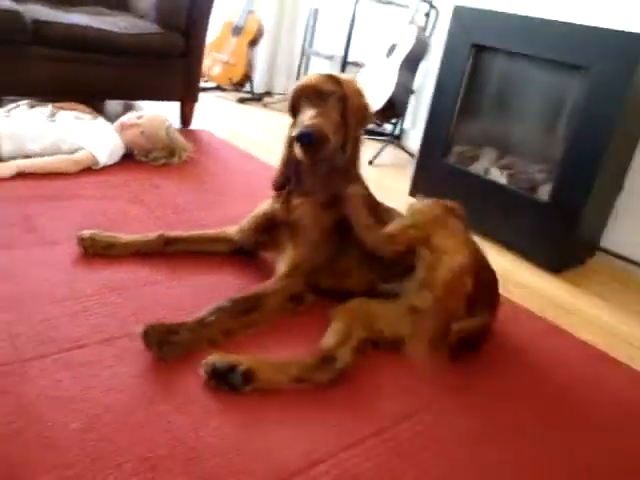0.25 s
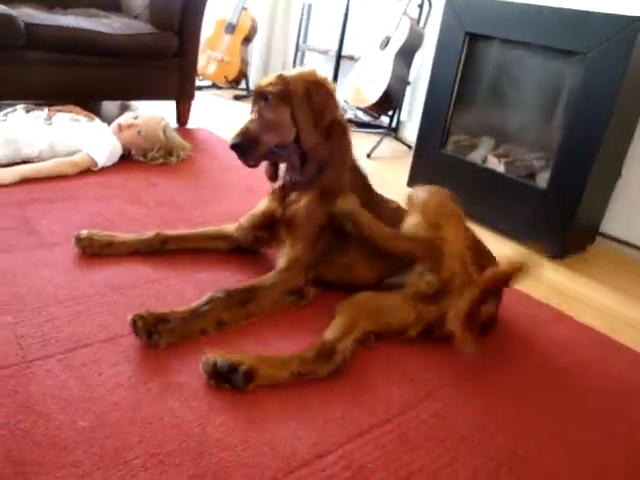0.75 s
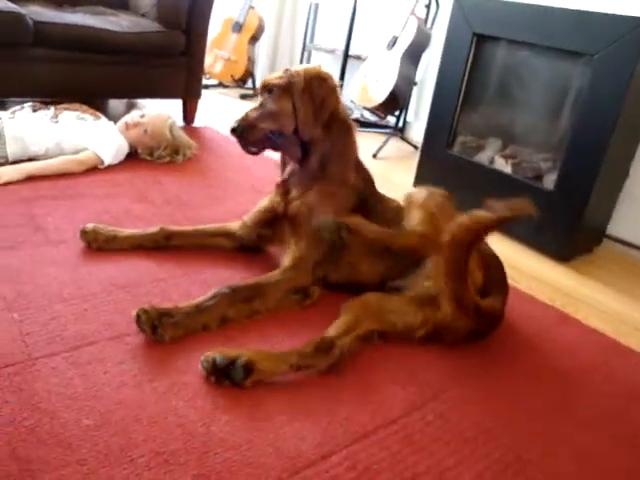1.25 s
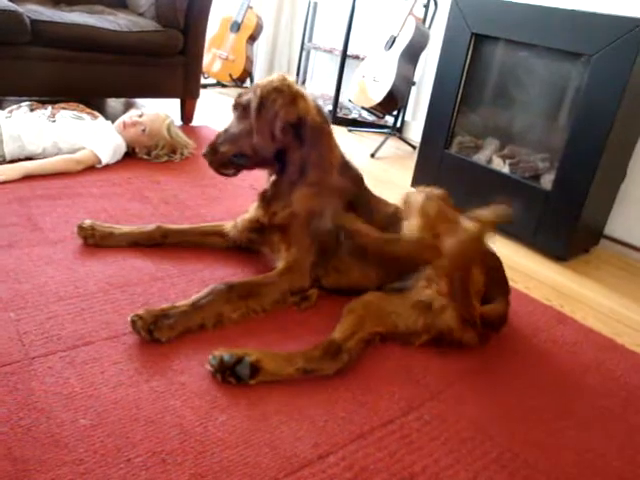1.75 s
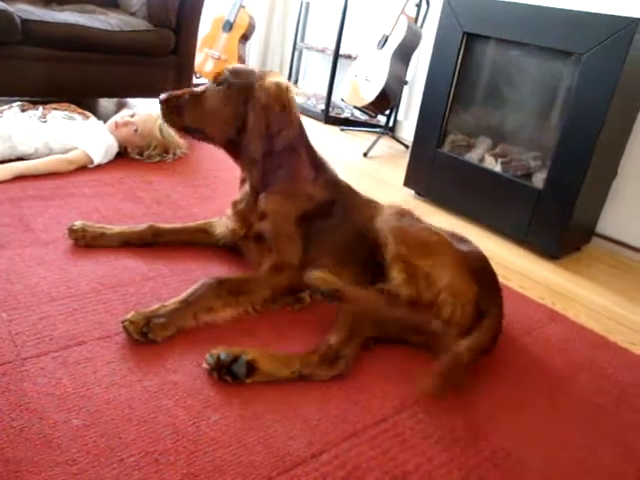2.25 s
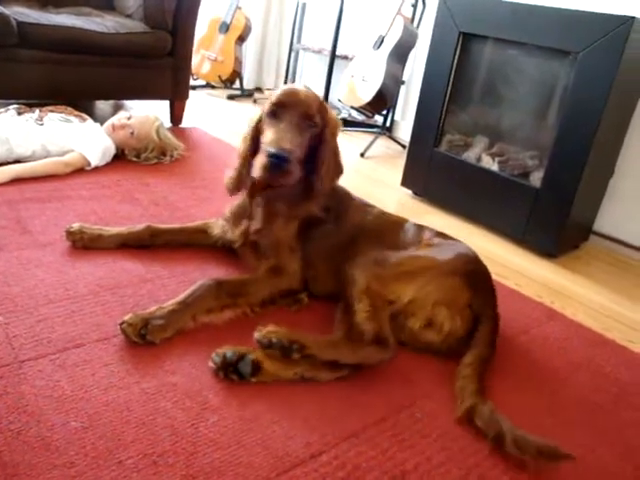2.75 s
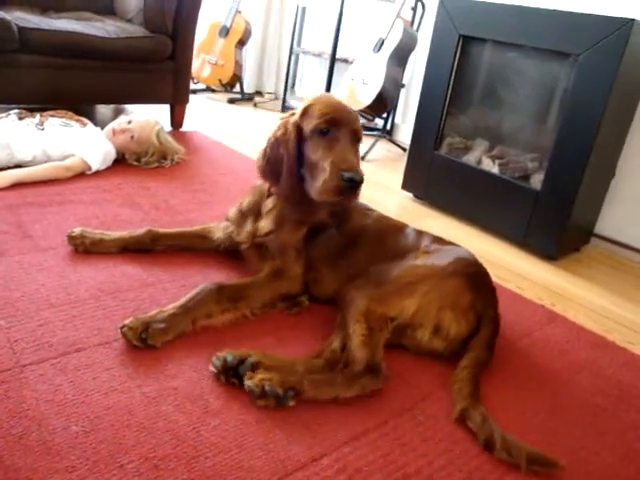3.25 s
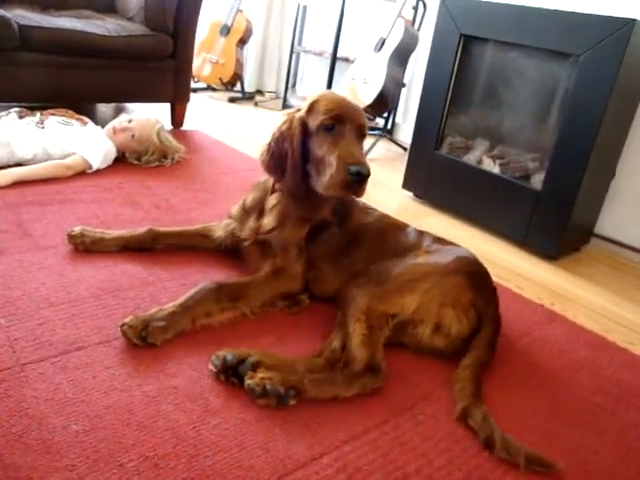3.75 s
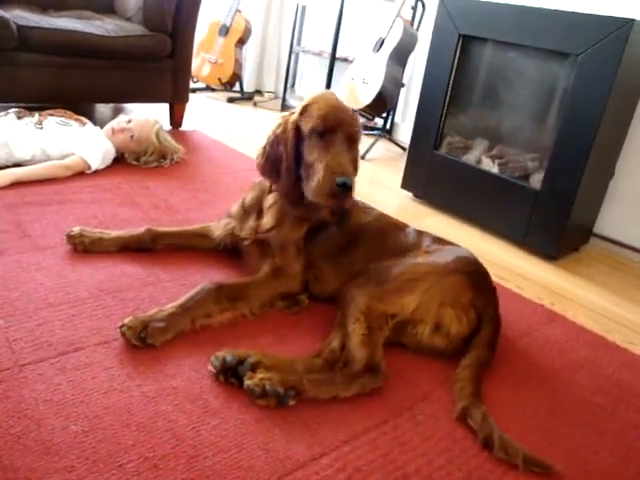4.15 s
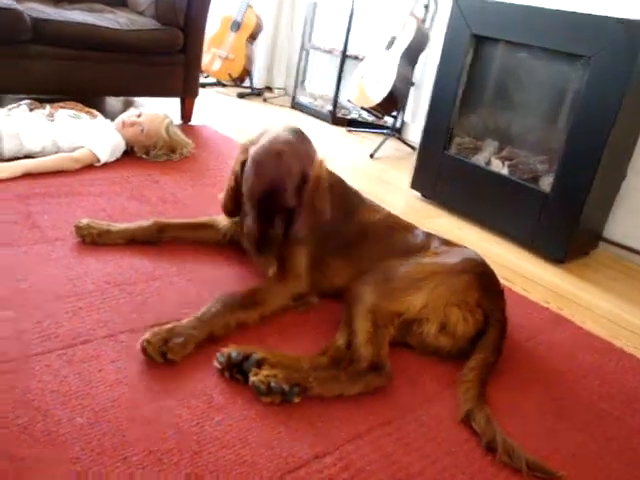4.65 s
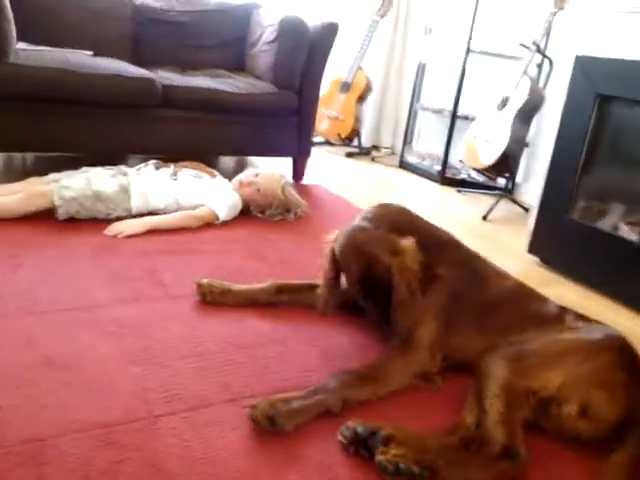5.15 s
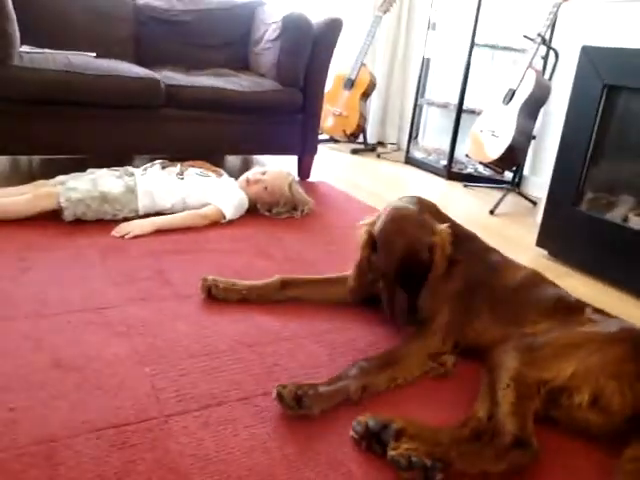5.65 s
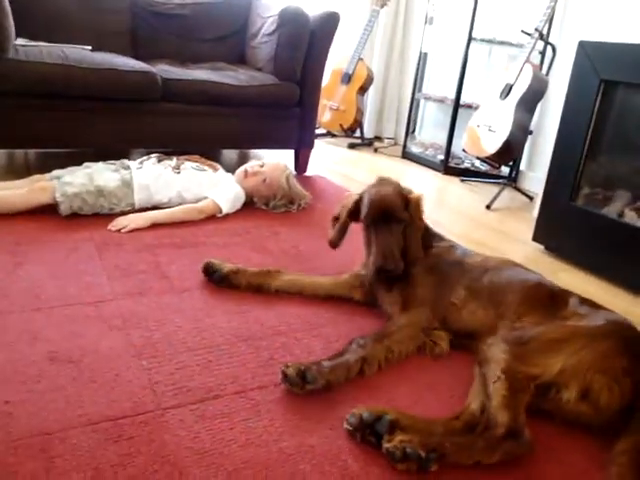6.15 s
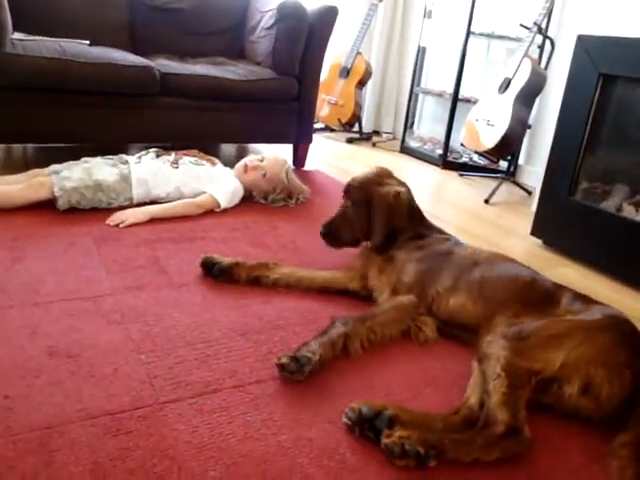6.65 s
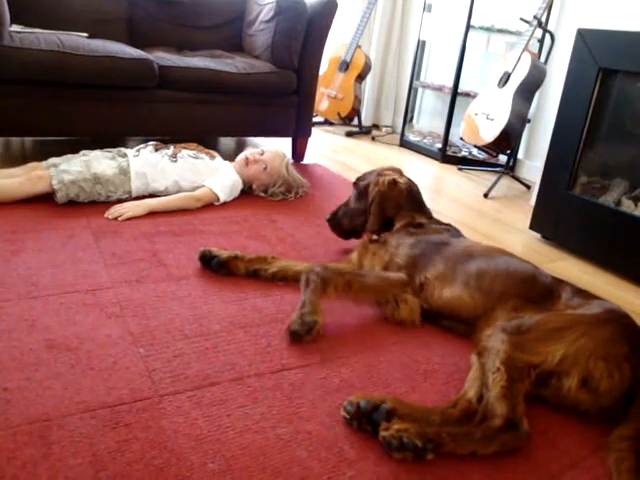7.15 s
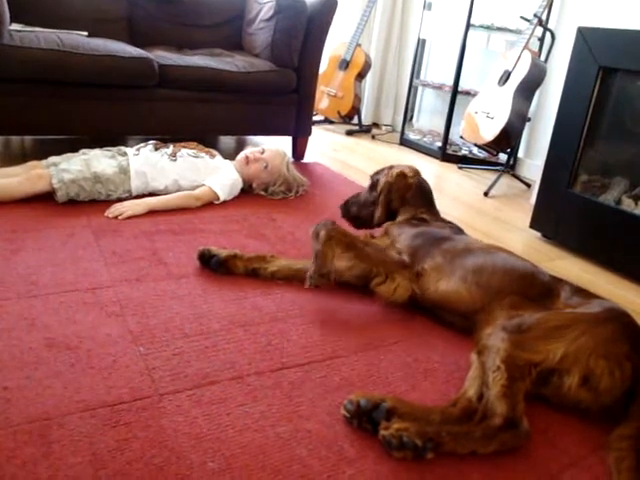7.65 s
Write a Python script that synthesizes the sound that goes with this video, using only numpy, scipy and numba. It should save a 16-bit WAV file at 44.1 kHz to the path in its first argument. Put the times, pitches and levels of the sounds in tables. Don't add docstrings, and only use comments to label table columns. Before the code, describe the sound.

Birds whistle faintly outside while a dog scratches and its claws tick; a sharp click, then a thin, wavering puppy whine in a live room.

```python
import sys
import numpy as np
from scipy import signal
from scipy.fft import rfft, irfft
from scipy.io import wavfile
from scipy.ndimage import uniform_filter1d
from numba import njit

SR = 44100
rng = np.random.default_rng(int(sys.argv[2]) if len(sys.argv) > 2 else 0)


def dump_mix(stems):
    frames = np.atleast_2d(stems).T
    limited = np.clip(frames, -1, 1)
    pcm = np.round(limited * 32767).astype(np.int16)
    wavfile.write(sys.argv[1], SR, pcm)


def to_linear_factor(level_db):
    exponent = np.asarray(level_db, float) / 20
    return 10 ** exponent


N = 348900


def unit(x):
    return x / np.sqrt(np.mean(x ** 2))


def walk(rate):
    hold = int(SR / rate)
    steps = np.repeat(rng.standard_normal(N // hold + 1), hold)
    return 1.233 * uniform_filter1d(uniform_filter1d(steps, hold), hold)[:N]


def track(table, fade_s=0.0048):
    s, *columns = np.transpose(table)
    t = np.arange(N) / SR
    gate = np.clip(np.minimum(t - s[0], s[-1] + fade_s - t) / fade_s, 0, 1)
    return gate, [np.interp(t, s, column) for column in columns]


@njit
def svf(x, hz, width):
    y, b, l = np.empty(len(x)), 0., 0.
    for i in range(len(x)):
        g, k = np.tan(np.pi * hz[i] / SR), width / hz[i]
        v = (b + g * (x[i] - l)) / (1 + g * (g + k))
        b, l, y[i] = 2 * v - b, l + 2 * g * v, k * v
    return y


def band(x, hz, width_hz):
    hz = hz + np.zeros(len(x))
    return svf(svf(x, hz, 1. * width_hz), hz, 1. * width_hz)


def swells(table):
    fall_db = 10
    t = np.arange(0, N / SR + .002, .001)
    shapes = []
    for top, rise, fall, *_ in table:
        distance = np.maximum((top - t) / max(rise, .01), (t - top) / max(fall, .01))
        shapes.append(to_linear_factor(-fall_db * distance))
    power = np.array(shapes) ** 2
    return lambda weight: np.interp(np.arange(N) / SR, t, np.asarray(weight) @ power) + 1e-30


# (f/Hz, level/dB)
HISS_SPECTRUM = [(15, -63.5), (25, -17.5), (199, -2.5), (337, 1.5), (412, 1), (478, 1), (872, -2),
                 (1240, -1.5), (1630, -4.5), (2620, -6.5), (3450, -7.5), (5410, -8.5), (9870, -9),
                 (12800, -25), (21700, -120)]


def floor():
    hz, db = np.transpose(HISS_SPECTRUM)
    f = np.arange(N // 2 + 1) * SR / N + 1
    colour = to_linear_factor(np.interp(np.log(f), np.log(hz), db))
    hiss = irfft(rfft(rng.standard_normal(N)) * colour, N)
    return to_linear_factor(-58 + .5 * walk(3.21)) * unit(hiss)


# (top t/s, rise t/s, fall t/s, centre f/Hz, level/dB)
BIRDS_HIGH = [(0., .1, 0.26, 6160, -56.5), (.51, 0.091, 0.08, 5830, -63), (.66, .03, 0.37, 6080, -60.5),
              (.99, .5, 0.4, 5870, -55.5), (1.32, 0.07, 0.46, 5750, -61.5), (1.72, 0.062, 0.13, 5980, -52),
              (1.87, 0.11, 0.18, 6000, -57.5), (2.27, 0.2, 0.062, 6100, -57.5),
              (2.44, 0.042, 0.13, 5700, -63), (3.06, 0.32, 0.2, 6110, -53.5),
              (3.48, 0.057, 0.47, 5910, -54), (3.9, 0.16, 0.14, 5670, -60.5), (4.05, 0.36, .4, 5960, -49.5),
              (4.25, 0.11, 0.18, 5980, -53.5), (4.43, 0.11, 0.25, 5710, -55),
              (4.97, 0.89, 0.12, 5960, -54.5), (5.18, 0.19, .3, 6150, -57), (5.62, 0.17, 0.38, 5650, -55.5),
              (5.79, 0.33, 0.3, 5620, -58.5), (6.08, 0.12, 0.16, 5660, -58), (6.39, .08, .25, 5760, -57.5),
              (7.31, 0.12, 0.14, 5520, -73.5), (7.89, 0.19, .05, 6100, -65)]
# (top t/s, rise t/s, fall t/s, centre f/Hz, level/dB)
BIRDS_LOW = [(.9, 0.66, 0.32, 5880, -59), (1.25, .06, 0.12, 5500, -61), (2.07, 0.3, 0.41, 5430, -57.5),
             (2.46, 0.38, 0.13, 5320, -61), (2.75, 0.039, 0.55, 5650, -57.5), (3.26, .1, 0.22, 5420, -66.5),
             (3.39, 0.019, .12, 5480, -56), (3.92, 0.074, 0.072, 5220, -55), (4.2, 0.24, .2, 5040, -56.5),
             (4.4, 0.17, 0.13, 5510, -61), (4.95, 0.21, 0.21, 5260, -54), (5.13, 0.14, 0.28, 5860, -61.5),
             (5.6, 0.7, 0.23, 5240, -58), (5.86, 0.43, 0.07, 5410, -54.5), (6.01, 0.068, .12, 4800, -66.5),
             (6.26, 0.016, 0.22, 5480, -62.5), (7.09, 0.27, 0.026, 5230, -65.5), (7.29, .2, 0.4, 5600, -68)]


def birds(table, width_hz, line_db):
    mix = swells(table)
    *_, centre, db = np.transpose(table)
    power = mix(to_linear_factor(2 * db))
    hz = np.clip(mix(to_linear_factor(2 * db) * centre) / power, 4500, 6500)
    blur = band(rng.standard_normal(N), hz * (1 + 0.01 * walk(5.5)), width_hz)
    blur = unit(signal.sosfilt(signal.butter(6, 6500, fs=SR, output="sos"), blur))
    line = unit(band(rng.standard_normal(N), hz * (1 + 0.012 * walk(9.7)), 88))
    return np.sqrt(power) * to_linear_factor(1.42 * walk(45)) * (blur + to_linear_factor(line_db + 3.3 * walk(5.4)) * line)


# (top t/s, rise t/s, fall t/s, level/dB, bright over dull level/dB)
RUB = [(0., .1, 0.22, -60.5, 6.5), (.122, 0.28, 0.016, -58.5, 5), (.46, 0.64, 0.59, -63, 2.5),
       (.96, .4, 0.3, -65, 5), (1.186, 0.049, 0.074, -74, 12.5), (1.45, 0.083, .04, -67, 1),
       (1.51, 0.067, 0.41, -56, -0.5), (1.74, 0.081, 0.13, -57, -0.5), (1.87, 0.24, 0.15, -52.5, -5),
       (2.13, .03, .25, -67, -1), (2.45, 0.31, 0.13, -61, -1), (2.6, 0.12, 0.91, -66, -10),
       (3.21, 0.071, .015, -59.5, -6.5), (3.3, 0.046, .02, -66, -3), (4.08, 0.69, .09, -67.5, -2),
       (4.24, 0.044, 1, -62.5, -13.5), (4.5, 0.032, 0.16, -70, 14.5), (4.6, 0.12, 0.1, -66.5, 14.5),
       (4.94, 0.34, 0.047, -65.5, 2.5), (5.04, 0.073, 0.3, -65.5, 1), (5.228, 0.022, 0.017, -60, -1),
       (5.67, 0.24, 0.36, -59, 7)]
# (top t/s, rise t/s, fall t/s, level/dB, bright over dull level/dB)
RUB_LATE = [(5.8, 0.061, 0.61, -57.5, 1), (6.1, 0.24, 0.15, -62, -14), (6.5, 0.16, .15, -70, 10),
            (6.7, 0.22, 0.33, -65, 0.5), (7.03, 0.18, 0.12, -73, 12.5), (7.1, 0.11, .15, -65.5, 8.5),
            (7.2, .1, 0.12, -67, 8), (7.3, 0.14, 0.14, -61.5, 1.5), (7.7, .5, 0.61, -65.5, -3)]


def fibre_snaps():
    size_db = np.minimum(2.7 * rng.exponential(size=N), 14)
    return rng.standard_normal(N) * to_linear_factor(size_db) * to_linear_factor(1.45 * walk(25))


def rub():
    strokes = RUB + RUB_LATE
    dull = unit(band(fibre_snaps(), 780, 1000))
    bright = unit(band(fibre_snaps(), 2340, 3000))
    mix = swells(strokes)
    *_, db, bright_db = np.transpose(strokes)
    return np.sqrt(mix(to_linear_factor(2 * db))) * dull + np.sqrt(mix(to_linear_factor(2 * (db + bright_db)))) * bright


# (t/s, peak level/dB, ring f/Hz, tail t60/s)
BOARDS = [
    (.01, -52, 350, 0.96),
    (.108, -53, 138, 0.24),
    (.49, -54.5, 132, 0.56),
    (1.172, -49, 393, 0.06),
    (1.83, -50, 121, 0.076),
    (2.44, -58, 109, 0.13),
]
# (t/s, peak level/dB, ring f/Hz, tail t60/s)
THUMPS = [
    (0.104, -39, 180, 0.24),
    (0.134, -39, 574, 0.083),
    (0.4885, -36, 347, 0.084),
    (0.505, -45, 242, 0.13),
    (.503, -44, 477, .04),
    (1.169, -43.5, 380, 0.057),
    (1.828, -47, 580, 0.17),
]
# (t/s, peak level/dB, ring f/Hz, tail t60/s)
TICKS = [(.154, -45, 2270, .03), (.2414, -41, 2150, 0.028), (.2503, -36.5, 2900, 0.049),
         (.4698, -45.5, 2780, .03), (.5222, -44, 2330, .03), (.7138, -39.5, 2300, .05),
         (.733, -44, 2300, .05), (.9158, -38, 2300, .04), (.9457, -35, 2330, .06), (1.0246, -49, 2360, .03),
         (1.1548, -44, 2430, .03), (1.1867, -44, 2350, .03), (1.2072, -41, 2250, 0.045),
         (1.2296, -44, 2350, .03), (1.418, -36, 2240, .025), (1.4245, -37.5, 2300, .025),
         (1.436, -36.5, 2330, .05), (2.0896, -51, 1100, .03), (2.4394, -46, 2000, .06),
         (5.2294, -46.5, 1270, .047), (5.5513, -43.5, 1240, 0.12), (5.6156, -36, 1200, .12),
         (5.6645, -41, 1800, .05), (5.64, -43, 1250, .05), (5.6795, -32.5, 1300, 0.089),
         (5.686, -35, 2600, 0.055), (.6, -41, 1100, .02), (.6045, -38.5, 1450, 0.028),
         (.608, -40, 2600, 0.022), (6.9257, -44, 1900, .05), (7.033, -34.5, 1780, 0.14),
         (7.09, -32, 1138, 0.11), (7.1492, -41, 1900, .06), (7.195, -35, 1900, .08),
         (7.2534, -41, 1900, .06)]


def hits(table, q, tail_db, spread):
    out, t = np.zeros(N + SR), np.arange(SR // 2) / SR
    for s, db, hz, t60 in table:
        ring = np.sin(2 * np.pi * hz * t) * np.exp(-np.pi * hz * t / q)
        ring *= np.clip(hz * t, 0, 1)
        tail = unit(band(rng.standard_normal(len(t)), hz, spread * hz))
        tail *= np.exp(-np.log(1000) * t / t60)
        i = int(s * SR)
        out[i:i + len(t)] += to_linear_factor(db) * (ring + to_linear_factor(tail_db) * tail)
    return out[:N]


def room(x):
    t60_s, treble_damping = 0.53, 0.55
    t = np.arange(SR) / SR
    noise = rng.standard_normal(SR)
    low = signal.sosfilt(signal.butter(1, 3000, fs=SR, output="sos"), noise)
    fall = np.log(1000) * t / t60_s
    tail = low * np.exp(-fall) + (noise - low) * np.exp(-fall * (1 + treble_damping))
    tail *= np.clip(t / 0.0085, 0, 1)
    return signal.fftconvolve(x, tail / np.sqrt(np.sum(tail ** 2)))[:N]


# (from t/s, to t/s, start f/Hz, end
# f/Hz, level/dB)
WHISTLES = [(0.422, 0.63, 5840, 6050, -64), (0.727, 1.053, 6010, 5900, -60), (1.2, 1.3, 5160, 5100, -67),
            (1.663, 1.8, 6000, 6250, -63), (2.893, 3.158, 6080, 6240, -57.5),
            (3.227, 3.505, 5200, 5230, -58), (3.354, 3.43, 5500, 5700, -62), (3.42, 3.615, 5880, 6400, -56),
            (3.83, 3.95, 5780, 6160, -54), (3.945, 4.193, 6360, 6370, -57), (5.046, 5.196, 5450, 5500, -61),
            (5.13, 5.318, 6730, 6780, -62), (7.794, 7.91, 2860, 2900, -60.5)]
# (from t/s, to t/s, start f/Hz, end f/Hz, level/dB)
SIDE_TONES = [
    (7.1, 7.22, 2400, 2520, -55),
    (7.22, 7.39, 2620, 2500, -59.5),
    (7.485, 7.51, 2610, 2600, -62),
    (7.72, 7.9, 4550, 4820, -67),
    (6.14, 6.22, 1170, 1110, -59.5),
    (2.4, 2.56, 5500, 6050, -62),
    (2.6, 2.26, 5950, 6250, -56),
]


def whistles(table):
    out = 0
    for t0, t1, hz0, hz1, db in table:
        gate, (hz,) = track([(t0, hz0), (t1, hz1)], fade_s=.03)
        out = out + gate * to_linear_factor(db) * unit(band(rng.standard_normal(N), hz, 130))
    return out


# (f/Hz, level/dB, t60/s)
SHELL = [(70, -37, .04), (350, -37, .016), (700, -42, .014), (1000, -39, .02), (1380, -33, .035),
         (1620, -34, .02), (2600, -29, .008), (3150, -34, .01), (3900, -37, .011), (4500, -33, .011),
         (5200, -37, .007), (5850, -31, .008), (7300, -36, .006), (8200, -33, .006), (9400, -32, .005)]


def click():
    t = np.clip(np.arange(N) / SR - 4.9697, 0, 1)
    out = np.zeros(N)
    for k, (hz, db, t60) in enumerate(SHELL):
        out += (-1) ** k * to_linear_factor(db) * np.sin(2 * np.pi * hz * t) * np.exp(-np.log(1000) * t / t60)
    return out


def fold(hz, jitter):
    smooth_hz = uniform_filter1d(hz, size=600)
    return 2 * np.pi * np.cumsum(smooth_hz * (1 + jitter * walk(40))) / SR


# (t/s, pitch f/Hz, effort level/dB, mouth opening level/dB)
WHINE = [
    [(5.68, 850, -45, 4), (5.714, 856, -40.5, -3), (5.726, 914, -33, -2), (5.75, 1026, -32.5, 2.5),
     (5.775, 1108, -38, 5.5), (5.81, 1235, -33, -3), (5.85, 1404, -32.5, -6), (5.885, 1485, -40, -0.5),
     (5.9, 1521, -31.5, -4)],
    [(5.94, 1546, -36.5, -0.5), (6.005, 1565, -32.5, 1), (6.028, 1551, -33, -6), (6.045, 1553, -34, 0),
     (6.07, 1537, -37.5, -5), (6.09, 1531, -52, 1), (6.13, 1525, -48, 1), (6.16, 1512, -35.5, -23),
     (6.21, 1492, -61, -7)],
    [(6.24, 1387, -38.5, -12), (6.275, 1352, -36, -8), (6.295, 1327, -35, -13), (6.33, 1337, -34, -9.5),
     (6.38, 1373, -41, -4), (6.405, 1391, -35, -8), (6.452, 1445, -42.5, -4), (6.495, 1509, -28, -15.5),
     (6.515, 1530, -43.5, 4)],
    [(6.545, 1560, -35.5, 0), (6.57, 1586, -41.5, 0), (6.61, 1601, -36.5, -9), (6.66, 1639, -43.5, -4.5),
     (6.7, 1658, -47.5, -17), (6.755, 1639, -46, -22), (6.785, 1622, -72, -10), (6.86, 1636, -58, -16),
     (6.92, 1636, -81, -4)],
]
# (t/s, pitch f/Hz, effort level/dB, mouth opening level/dB)
WHIMPER = [
    [(6.92, 1252, -64, -13), (6.945, 1195, -46, 0), (6.97, 1185, -36, -7), (7.005, 1217, -49, 5.5),
     (7.035, 1253, -37.5, -4.5), (7.06, 1326, -56.5, 5), (7.1, 1363, -45, -3)],
    [(7.135, 1390, -51, 0), (7.21, 1395, -48, -1), (7.27, 1410, -54, -10), (7.3, 1462, -57, -8),
     (7.34, 1458, -68, -5), (7.37, 1466, -53, -15), (7.41, 1455, -75, -12), (7.47, 1435, -57.5, -14)],
    [(7.5, 1349, -63, -4), (7.53, 1306, -57, -10), (7.57, 1258, -58, -15)],
    [(7.6, 1228, -51.5, -5), (7.66, 1233, -42.5, -11), (7.69, 1336, -51.5, 4), (7.72, 1480, -52.5, -6),
     (7.78, 1598, -56, 1), (7.84, 1623, -58.5, 1), (7.91, 1566, -59, -8)],
]
OVERTONES = [-2, -10.5, -15]
# (f/Hz, level/dB)
SNOUT = [(1700, -6.5), (2100, -6), (2650, -0.5), (3080, 1.5), (3500, 1), (4100, -10.5), (4700, -14),
         (6500, -23)]


def whine(notes, flutter_db, press_db):
    relax_db_per_s = 6
    gate, (hz, db, open_db) = track(sum(notes, []))
    phase = fold(hz, 0.00324)
    snout_hz, snout_db = np.transpose(SNOUT)
    age_s = np.clip(np.arange(N) / SR - notes[0][0][0], 0, None)
    partial_dbs = [db]
    for k, tilt_db in enumerate(OVERTONES, 2):
        pressed_db = (press_db - relax_db_per_s * age_s) * (k - 2)
        shaped_db = np.interp(np.log(k * hz), np.log(snout_hz), snout_db)
        partial_dbs.append(db + open_db + tilt_db + pressed_db + shaped_db)
    flutter = to_linear_factor(flutter_db) * unit(band(rng.standard_normal(N), 200, 290))
    lines = 0
    for k, partial_db in enumerate(partial_dbs, 1):
        lines = lines + to_linear_factor(partial_db + 1.6 * walk(35)) * np.sin(k * phase)
    strain = np.clip((hz - 1450) / 100, 0, 1)
    rasp = to_linear_factor(-13 + partial_dbs[1]) * strain * unit(band(rng.standard_normal(N), 3450, 280))
    return gate * (np.sqrt(2) * (1 + flutter) * lines + rasp), gate * np.sin(phase)


# (delay t/s, level/dB)
EARLY = [
    (.0041, -20.5),
    (0.011, -23.5),
    (0.0195, -11.5),
    (.029, -14),
]


def early(x):
    out = x.copy()
    for delay, db in EARLY:
        out[int(delay * SR):] += to_linear_factor(db) * x[:N - int(delay * SR)]
    return out


# (f/Hz, width f/Hz, level/dB)
STANDING = [
    (1195, 7, 2),
    (2400, 12, -2),
]


def standing_waves(x):
    return sum(to_linear_factor(db) * svf(x, hz + np.zeros(N), 1. * width) for hz, width, db in STANDING)


# (t/s, pitch f/Hz,
# level/dB)
UNDERTONE = [
    [(6.63, 1050, -61.5), (6.68, 952, -55), (6.72, 920, -65), (6.77, 885, -67), (6.83, 840, -68),
     (6.9, 852, -57), (6.95, 874, -61)],
    [(7.05, 1200, -49), (7.1, 1195, -49), (7.15, 1184, -53)],
    [(7.13, 1070, -53), (7.185, 1008, -56), (7.21, 991, -58), (7.25, 1005, -50), (7.31, 999, -51),
     (7.345, 1041, -55), (7.4, 955, -56), (7.47, 945, -55)],
    [(7.49, 1000, -57), (7.53, 1020, -56), (7.58, 1042, -56.5), (7.61, 1040, -71)],
    [(7.74, 990, -59), (7.79, 980, -64), (7.82, 993, -57), (7.86, 974, -58), (7.91, 1040, -56.5)],
]


def undertone(upper, sum_db):
    out = 0
    for note in UNDERTONE:
        gate, (hz, db) = track(note)
        tone = gate * to_linear_factor(db + 4 * walk(60)) * np.sqrt(2) * np.sin(fold(hz, .024))
        out = out + tone + to_linear_factor(sum_db) * band(tone * upper, 3000, 1200)
    return out


def scene():
    song = whistles(WHISTLES)
    outside = birds(BIRDS_HIGH, 1000, -7.0) + birds(BIRDS_LOW, 1200, -7.5) + song
    paws = hits(THUMPS, 4.7, -10.0, 2.0) + hits(BOARDS, 1.0, -5.0, 1.0)
    claws = hits(TICKS, 8, -15, .7)

    *middle, final = WHIMPER
    first, upper1 = whine(WHINE, -24, 1.6)
    later, upper2 = whine(middle, -19.5, -14)
    last, upper3 = whine([final], -28, 4)
    voice = first + later + last
    low = undertone(upper1 + upper2 + upper3, 2.2)

    sends = to_linear_factor(-4.5) * voice + to_linear_factor(-5.5) * low + to_linear_factor(-3) * paws + to_linear_factor(-6.5) * claws + to_linear_factor(-16.0) * song
    dog = to_linear_factor(-1.0) * early(voice) + standing_waves(voice) + to_linear_factor(-6.5) * low + whistles(SIDE_TONES)
    indoor = dog + paws + claws + rub() + room(sends) + outside
    thin = signal.sosfilt(signal.butter(2, 55, "high", fs=SR, output="sos"), indoor)
    return (thin + click() + floor())[None]


# (middle t/s, half length t/s, number of bands muted)
SHORT_SPELLS = [
    (.25, .05, 16),
    (1.75, .06, 34),
    (1.9, .05, 34),
    (2.17, .08, 56),
    (2.63, .04, 12),
    (3.69, .012, 18),
]


def treble_holes():
    holes_per_s, longest_s = 45, .012
    times = [.05 + 7.7 * rng.random(int(holes_per_s * N / SR))]
    times += [s + half * rng.uniform(-1, 1, n) for s, half, n in SHORT_SPELLS]
    times = np.concatenate(times)
    holes = []
    for s, (f, w, h) in zip(times, rng.random((len(times), 3))):
        low_hz = 5600 + 4300 * f ** 1.5
        holes.append((s, s + longest_s * w ** 3, low_hz, low_hz + 350 + 1100 * h ** 2))
    return holes


# (from t/s, to t/s, low f/Hz, high f/Hz)
MUTED = [
    (4.9755, 4.98, 4700, 6350),
    (4.979, 5.001, 2750, 6350),
    (4.977, 5.002, 7250, 12000),
    (4.9795, 4.9835, 2750, 12000),
    (4.999, 5.0005, 900, 12000),
]


def mute_bands(x):
    out, size = x.copy(), 4096
    f = np.arange(size // 2 + 1) * SR / size
    for t0, t1, lo, hi in MUTED + treble_holes():
        i = np.arange(size) + int(t0 * SR) - size // 4
        mute = np.clip(np.minimum(i / SR - t0, t1 - i / SR) / .0035 + 1, 0, 1)
        out[:, i] -= mute * irfft(rfft(out[:, i]) * ((f >= lo) & (f < hi)), size)
    return out


def band_limit(x):
    return signal.sosfilt(signal.butter(12, 10020, fs=SR, output="sos"), x)


def record(dry):
    heard = signal.sosfiltfilt(signal.butter(10, 10150, fs=SR, output="sos"), dry)
    mix = mute_bands(heard)
    return band_limit(mix)


dry = scene()
out = record(dry)
dump_mix(out)
```